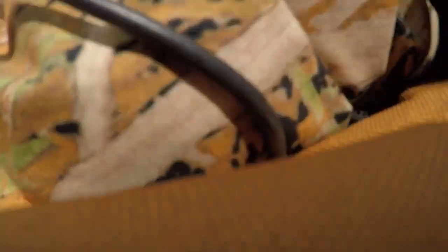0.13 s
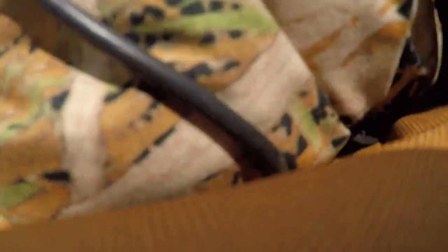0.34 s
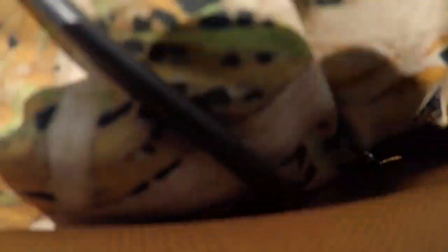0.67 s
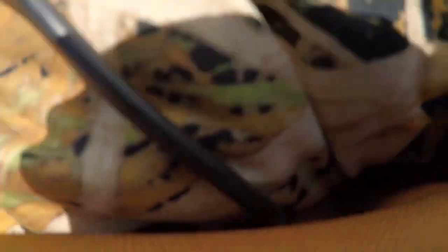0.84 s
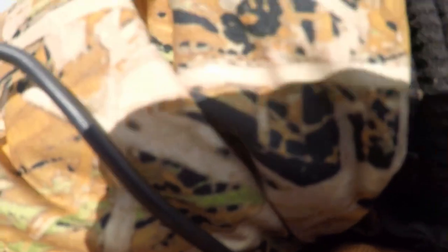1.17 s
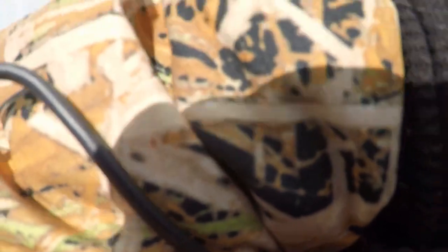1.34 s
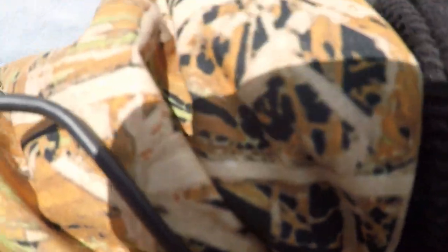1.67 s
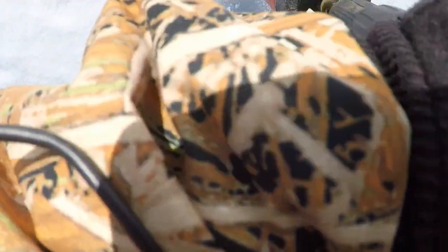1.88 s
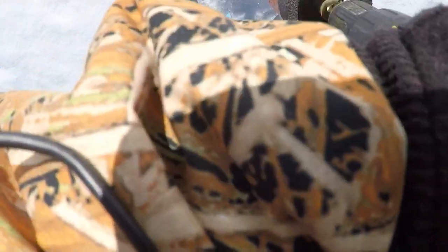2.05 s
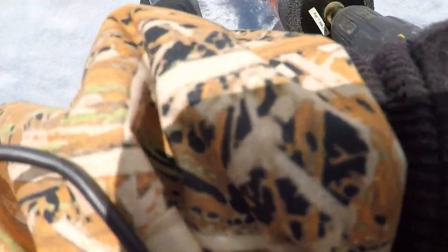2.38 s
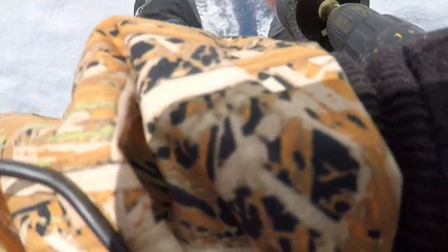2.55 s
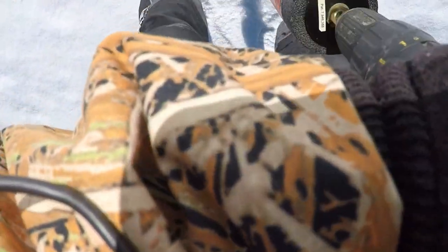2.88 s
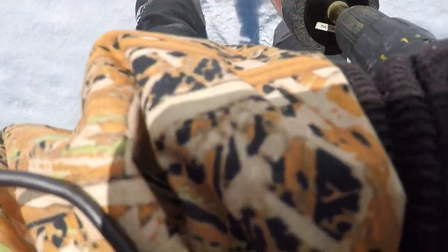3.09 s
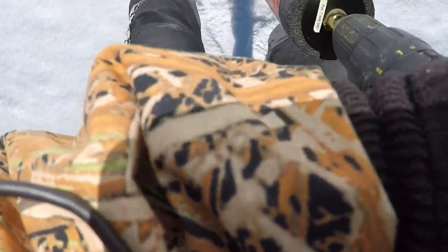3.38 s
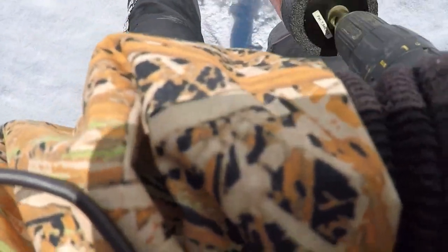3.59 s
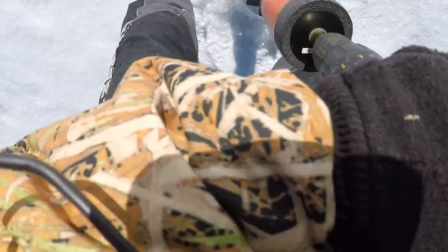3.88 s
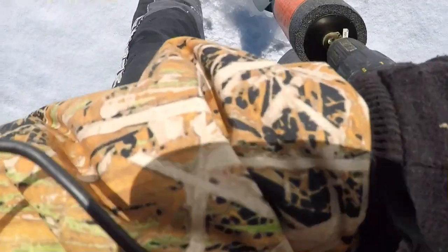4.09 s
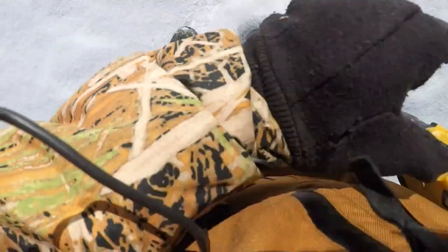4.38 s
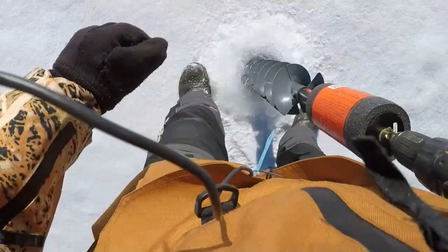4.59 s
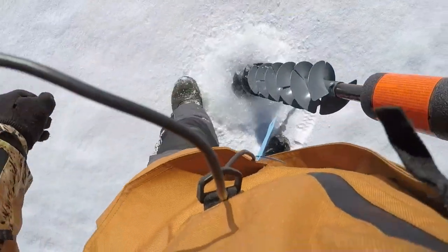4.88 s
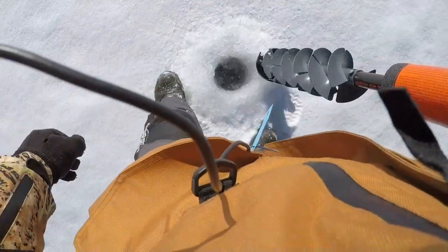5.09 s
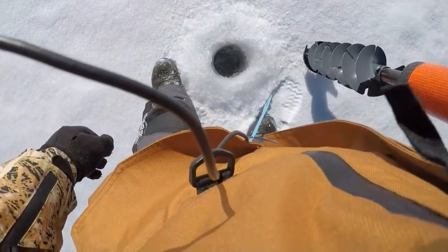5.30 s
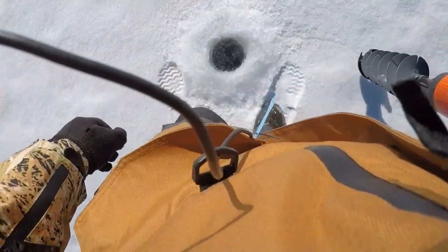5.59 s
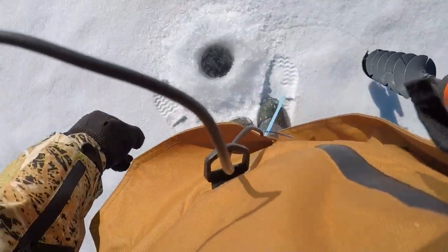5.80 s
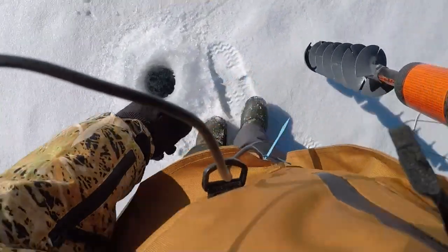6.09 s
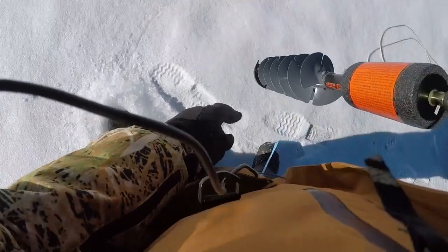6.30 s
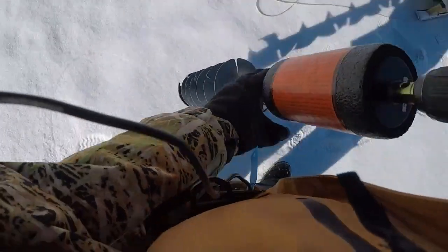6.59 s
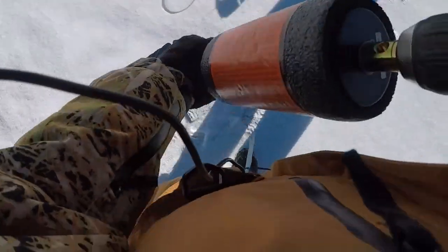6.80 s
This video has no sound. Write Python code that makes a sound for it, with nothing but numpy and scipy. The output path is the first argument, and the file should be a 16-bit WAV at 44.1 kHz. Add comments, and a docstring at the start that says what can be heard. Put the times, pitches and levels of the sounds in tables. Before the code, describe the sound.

Fabric rustle and small ticks, a whining drill grinding through ice, watery slush and slaps, a few clinks of ice, then low wind gusts and jacket rustle.

```python
"""A sleeve rubs and small knocks tick; then a cordless drill spins up an ice auger: gear tones, shaped noise.
A gust swells as the blades whisk snow, then bore in jittery ice grains, ringing a steadily deeper hole.
They break through, the drill races and stops; slush surges from grains, pockets of air slap as sine chirps.
The flights drain and lumps of ice clink through resonances; last, gusts of low noise buffet the microphones
on the driller's chest, while the jacket rustles in fine grains and a strap zips."""
import sys
import numpy as np
from scipy import signal
from scipy.fft import rfft, irfft, next_fast_len
from scipy.io import wavfile
from scipy.ndimage import uniform_filter1d, map_coordinates

SR = 44100
rng = np.random.default_rng(int(sys.argv[2]) if len(sys.argv) > 2 else 0)


def persist_wave(psi):
    """Save psi, clipped to +-1, as 16-bit WAV."""
    counts = np.round(np.clip(psi, -1, 1) * 32767).astype(np.int16)
    wavfile.write(sys.argv[1], SR, np.atleast_2d(counts).T)


N = 306318


def amp(db):
    """Decibels to gain."""
    return 10 ** (np.asarray(db) / 20)


def unit(x):
    """Scale to rms 1."""
    return x / np.sqrt(np.mean(x ** 2) + 1e-20)


def curves(rows):
    """One value per sample for each column after the time."""
    s, *columns = np.transpose(rows)
    return [np.interp(np.arange(N) / SR, s, column) for column in columns]


def stroke(start_s, length_s, attack_s, release_s):
    """Rise from start_s, hold until length_s is over, then fall 60 dB in release_s."""
    t = np.arange(N) / SR - start_s
    return np.clip(t / attack_s, 0, 1) * amp(-60 * np.maximum(t - length_s, 0) / release_s)


def ramp(start_s, length_s):
    """Go from 0 to 1 and stay there."""
    return np.clip((np.arange(N) / SR - start_s) / length_s, 0, 1)


def hump(s, half_s):
    """A bell of height 1 around s."""
    return np.exp(-((np.arange(N) / SR - s) / half_s) ** 2)


def wobble(rate):
    """A smooth random curve, rate knots a second."""
    return map_coordinates(rng.standard_normal(8192), [np.arange(N) * rate / SR], mode="wrap")


def noise():
    """White noise."""
    return rng.standard_normal(N)


def grains(rate, spread_db):
    """Random tiny impacts of uneven size, rate a second, at rms 1."""
    hits = rng.random(N) < rate / SR
    sizes = amp(spread_db * np.clip(noise(), -2, 2))
    return unit(hits * np.sign(noise()) * sizes)


def filtered(x, response):
    """x times a complex response of frequency."""
    m = next_fast_len(N + SR // 2)
    return irfft(rfft(x, m) * response(np.fft.rfftfreq(m, 1 / SR)), m)[..., :N]


def coloured(x, spectrum):
    """x shaped by (Hz, dB) points, at rms 1."""
    f, db = np.transpose(spectrum)
    return unit(filtered(x, lambda hz: amp(np.interp(np.log(hz + 1), np.log(f + 1), db))))


def ringing(x, modes):
    """x through damped resonances, at rms 1."""
    def response(f):
        return sum(amp(db) * 1j * f * width / (centre * centre - f * f + 1j * f * width)
                   for centre, width, db in modes)
    return unit(filtered(x, response))


def low_cut(x, edge_hz):
    """Thin out everything below edge_hz, at rms 1."""
    return unit(filtered(x, lambda hz: hz ** 2 / np.sqrt(hz ** 4 + edge_hz ** 4)))


def patchy(x, depth_db):
    """Let neighbouring pitches swell and fade on their own for some tens of milliseconds."""
    z = signal.stft(x, nperseg=1024)[2]
    field = uniform_filter1d(rng.standard_normal(z.shape), size=4, axis=0)  # across pitch
    field = uniform_filter1d(field, size=4, axis=1)  # across time
    return unit(signal.istft(z * amp(depth_db * unit(field)), nperseg=1024)[1][:N])


def stereo(mid, spectrum, side_db):
    """Colour an excitation and add a noise part that differs between the channels."""
    side = amp(side_db) * noise()
    return coloured(np.array([mid + side, mid - side]), spectrum)


def panned(x, pan_db):
    """Lean to the left by pan_db, keeping the centre level."""
    gains = amp(np.array([pan_db + np.zeros(N), -pan_db + np.zeros(N)]) / 2)
    return x * gains / gains.mean(0)


def add(track, s, sound):
    """Mix a sound into a track at s seconds."""
    part = track[max(round(s * SR), 0):][:len(sound)]
    part += sound[:len(part)]


TEETH, GEAR_RATIO = 9, 27.5  # teeth meshing per motor turn; motor turns per auger turn
TRIGGER_S, RUN_S = 1.055, 3.0  # the trigger is pulled, and held this long
BITE_S, THROUGH_S = 1.267, 3.625  # the blades touch the ice; they break through
DRILL_DB, LOADED_DB = -29.5, -1  # drill level running free; its change under load
FULL_HZ, SLOW_DB_PER_OCTAVE = 2520, 14  # below this mesh speed the free-running gears get quieter
COVERED_DB, UNCOVER_S = -5, 0.37  # a sleeve screens the drill at first, then clears it over this time
COAST_S = 1.0  # the motor's fine sizzle outlasts the gears
# the motor spins up, sags under load, races at breakthrough and brakes: (time [s], gear mesh rate [Hz])
MESH_SPEED = [(1.05, 915), (1.09, 2106), (1.15, 2940), (1.2, 3110), (1.27, 2990), (1.4, 2213), (2.6, 1980),
              (3.58, 2130), (3.66, 2785), (3.72, 3004), (3.86, 3067), (3.92, 2807), (3.98, 2046),
              (4.1, 611)]
# gear tones: (multiple of the motor shaft [-], level running free [dB], level under load [dB])
GEAR_TONES = [(3, -13, -14), (9, -.5, -6), (12, -10, -9), (13, -8, -1), (18, -18, -14), (24, -40, -2)]
# rattle of the gear teeth: (frequency [Hz], relative level [dB])
GEARBOX_COLOUR = [(120, -40), (200, 4), (391, -20), (520, -11), (1070, 0), (1220, -7), (2130, -11),
                  (3020, -11.5), (3580, -13), (4600, -9), (5620, -13), (6430, -26.5), (11000, -50),
                  (14300, -86), (22000, -120)]
# fine treble of the motor: (frequency [Hz], relative level [dB])
SIZZLE_COLOUR = [(6760, -62), (11500, -18), (12000, 10), (12700, 4.5), (14700, 4), (15500, -17)]
# the drill's housing felt through the jacket: (frequency [Hz], relative level [dB])
HOUSING_BUZZ = [(350, -23), (650, -1), (1200, 0), (1900, -22), (4000, -60)]


def drill():
    """Gears whine and rattle once a shaft turn; under load the speed sways with every turn of the auger."""
    mesh_hz, = curves(MESH_SPEED)
    contact = stroke(BITE_S, THROUGH_S - BITE_S, attack_s=.05, release_s=.4)
    load = np.clip((2750 - mesh_hz) / 600, 0, 1) * contact
    hard_ice = load * ramp(1.4, 0.292)
    sway = hard_ice * (0.0314 * auger_turn() + 0.01202 * wobble(30)) + 0.0022 * wobble(120)
    shaft = 2 * np.pi * np.cumsum(mesh_hz * (1 + sway)) / TEETH / SR

    whine = np.zeros(N)
    for k, free_db, loaded_db in GEAR_TONES:
        tone_db = free_db + hard_ice * (loaded_db - free_db) + 2.5 * wobble(60)
        # backlash smears the tones, more so the high and the loaded ones
        smear = k / TEETH * (.3 + .27 * hard_ice) * wobble(260)
        whine += amp(tone_db) * np.sin(k * shaft + smear)
    whine *= np.clip(mesh_hz / 2200, 0, 1) ** 4  # a slow gear is quiet

    teeth = unit(noise() * (1 + 0.26 * np.cos(shaft)) * amp(1.1 * wobble(70)))
    rattle = stereo(patchy(teeth, depth_db=4), GEARBOX_COLOUR, side_db=-14) * amp(6.5 - 2 * load)
    sizzle = panned(stereo(teeth, SIZZLE_COLOUR, side_db=-2.5), pan_db=8.5) * amp(-19.5)
    # the housing rocks the microphones from side to side: opposite signs left and right
    buzz = amp(5.5) * coloured(noise(), HOUSING_BUZZ) * np.array([[1], [-1]])

    slow_db = SLOW_DB_PER_OCTAVE * np.minimum(np.log2(mesh_hz / FULL_HZ), 0) * (1 - load)
    cover_db = COVERED_DB * (1 - ramp(TRIGGER_S, UNCOVER_S))
    level_db = DRILL_DB + LOADED_DB * load + slow_db + cover_db
    gear_run = stroke(TRIGGER_S, RUN_S, attack_s=0.0097, release_s=.35)
    sizzle_run = stroke(TRIGGER_S, RUN_S, attack_s=0.11, release_s=COAST_S)
    gears = amp(level_db) * gear_run * (rattle + amp(-3.5) * whine + buzz)
    return gears + amp(level_db - slow_db / 2) * sizzle_run * sizzle  # sizzle depends less on speed


TURN_RAD = 0.49  # where in the turn the harder side lies


def auger_turn():
    """Swings once per turn of the auger, as the blades bite harder on one side."""
    mesh_hz, = curves(MESH_SPEED)
    return np.sin(2 * np.pi * np.cumsum(mesh_hz) / TEETH / GEAR_RATIO / SR + TURN_RAD)


# the air column in the hole deepens: (time [s], resonance [Hz], level relative to the scraping [dB])
HOLE_RESONANCE = [(1.4, 1050, -10), (2.1, 900, -10), (2.35, 820, -7), (2.52, 640, -2), (2.66, 550, -6),
                  (2.95, 460, -15), (3.66, 330, -12)]


def air_column(x, width_hz):
    """The hole's resonance slides down by crossfading through neighbouring fixed ones."""
    pitch_hz, ring_db = curves(HOLE_RESONANCE)
    steps = np.geomspace(pitch_hz.min(), pitch_hz.max(), num=12)
    column = np.zeros(N)
    for hz, share in zip(steps, np.eye(len(steps))):
        column += np.interp(pitch_hz, steps, share) * ringing(x, [(hz, width_hz, 0)])
    return amp(ring_db) * column


SCRAPE_DB, SINK_S, SINK_DB = -18, 0.52, 8  # full scraping; it grows by SINK_DB while the blades sink in
TURN_DB = 0.5  # swing of the scraping with each turn
GRIP_S = 0.015  # half the length of a skid or catch
SNOW_S, SNOW_DB = 1.133, -28.5  # the blades whisk loose snow
# the blades skid (-) or catch (+): (time [s], level change [dB])
SKIDS_AND_CATCHES = [(1.797, -10), (1.847, 4), (2.095, 1.5), (2.34, 4.5), (2.425, 2), (2.49, -5),
                     (2.587, -8.5), (2.709, -2.5), (3.234, 0.5), (3.3, 3.5), (3.415, 2.5), (3.453, -4.5)]
# the drill shakes the arms and chest: (time [s], level [dB])
SHAKE_LEVEL = [(1.3, -35), (1.55, -16), (1.9, -12.5), (2.33, -19.5), (2.62, -18.5), (2.92, -15),
               (3.25, -19.5), (3.5, -17.5), (3.63, -22)]
# that shaking's low rumble: (frequency [Hz], relative level [dB])
SHAKE_COLOUR = [(12, -32), (20, -5.5), (76, 0), (103, -4), (141, -10), (179, -4), (300, -45), (400, -20.5),
                (520, -37), (880, -120)]
# chipped ice: (frequency [Hz], relative level [dB])
ICE_COLOUR = [(260, -47), (450, -12.5), (535, -4.5), (1320, 4), (2170, -9.5), (2960, -8.5), (3560, -15.5),
              (4790, -21.5), (5760, -24.5), (7000, -34.5), (9100, -41.5), (15400, -120)]
# resonances of the steel auger: (frequency [Hz], width [Hz], level [dB])
AUGER_MODES = [(1157, 49, 5.5), (1393, 73, -3.5), (2980, 110, -1), (4680, 124, -8)]
# whisked loose snow: (frequency [Hz], relative level [dB])
SNOW_COLOUR = [(2060, -24), (3500, -6.5), (3780, 9.5), (5490, -7), (5990, 6), (6370, -2), (7250, -0.5),
               (11000, -29), (14300, -64), (22000, -120)]


def cutting():
    """Blades whisk snow, then chip the ice in judders; auger and hole ring, and the arms pass on the shaking."""
    grip_db = TURN_DB * auger_turn() + sum(db * hump(s, GRIP_S) for s, db in SKIDS_AND_CATCHES)
    scrape_db = SCRAPE_DB - SINK_DB * (1 - ramp(BITE_S, SINK_S)) + grip_db
    shake_db = curves(SHAKE_LEVEL)[0] + 0.44 * grip_db
    judder_db = 1.2 * wobble(28.19) + 1.17 * wobble(130)

    def chips():
        return unit(grains(rate=5000, spread_db=1.0) * amp(judder_db))

    scrape = stereo(patchy(chips(), depth_db=1.8), ICE_COLOUR, side_db=-18)
    ring_colour = [(400, -30), (900, -3.5), (5000, -1.0), (8000, -38)]
    ring = amp(-9) * coloured(ringing(chips(), AUGER_MODES), ring_colour)
    hole = filtered(air_column(chips(), width_hz=37), lambda hz: 1 / (1 + (hz / 1500) ** 4))
    shake = panned(stereo(noise() * amp(1.9 * judder_db), SHAKE_COLOUR, side_db=4.5), pan_db=-10.0)

    powder = stereo(grains(rate=4900, spread_db=4), SNOW_COLOUR, side_db=-5.5)
    snow = amp(SNOW_DB) * stroke(SNOW_S, 0.29, attack_s=.13, release_s=1.73) * powder
    boring = stroke(BITE_S, THROUGH_S - BITE_S, attack_s=0.3, release_s=0.13)
    return snow + boring * (amp(scrape_db) * (scrape + ring + hole) + amp(shake_db) * shake)


SURGE_ATTACK_S, SURGE_RELEASE_S = 0.018, 0.26
DRAIN_S, DRAIN_DB_PER_S = 4.3, 13  # from then on the lifted flights drain, ever more quietly
DRAIN_CHURN_DB, DRAIN_SPRAY_DB = -40.5, -48.5
# the auger is pulled up in surges, thinner as it clears the water:
# (time [s], length [s], churning level [dB], spray level [dB], low-cut edge [Hz])
SLUSH_SURGES = [(3.63, 0.17, -26.5, -52, 140), (3.89, 0.073, -27, -50, 140), (4.023, 0.23, -35, -48, 140),
                (4.272, 0.042, -29.5, -53, 202), (4.446, 0.21, -28.5, -52.5, 564)]
# churned water: (frequency [Hz], relative level [dB])
WATER_COLOUR = [(76, -39), (130, -13), (167, 11.5), (205, 2), (327, 3), (560, -4), (718, 2), (945, -1.5),
                (1530, -12.5), (1690, -13), (1830, -11), (2380, -15.5), (3500, -26), (4550, -56),
                (7700, -120)]
# thrown spray: (frequency [Hz], relative level [dB])
SPRAY_COLOUR = [(1060, -12), (1800, -2), (2390, 2), (3530, -1.5), (4780, 1), (5700, -3), (7310, -34),
                (8650, -56), (11000, -45), (12600, -16), (15000, -24)]
# ice crumbs striking the flights: (frequency [Hz], width [Hz], level [dB])
CRUMB_MODES = [(1880, 210, 7.5), (2030, 69, -17), (4150, 180, 6), (4600, 100, 8)]
# water and ice slapping in the hole: (time [s], level [dB], starting pitch [Hz])
SLAPS = [(3.735, -16, 1834), (3.787, -14, 1225), (3.936, -10, 789), (4.052, -8.5, 857), (4.123, -21.5, 770),
         (4.158, -32, 756), (4.185, -21, 683), (4.297, -23, 846), (4.322, -17.5, 855), (4.488, -16, 1013),
         (4.529, -18, 1130), (4.638, -17, 937), (4.679, -17.5, 960), (4.735, -24.5, 820)]


def slush():
    """The flights churn water and ice, throw spray and crumbs, and slap pockets of air into ringing."""
    churn_grains = grains(rate=1200, spread_db=3.5) * amp(2.9 * wobble(60))
    churn = coloured(patchy(churn_grains, depth_db=2), WATER_COLOUR)
    spray = coloured(patchy(grains(rate=2900, spread_db=3.0), depth_db=0.5), SPRAY_COLOUR)
    crumbs = amp(-1.5) * ringing(grains(rate=320, spread_db=3.5), CRUMB_MODES)
    spray = spray + filtered(crumbs, lambda hz: 1 / (1 + (hz / 6000) ** 10))  # wet ice lands softly

    surges = np.zeros(N)
    for s, length, churn_db, spray_db, low_hz in SLUSH_SURGES:
        pull = stroke(s, length, SURGE_ATTACK_S, SURGE_RELEASE_S)
        surges += pull * (amp(churn_db) * low_cut(churn, low_hz) + amp(spray_db) * spray)
    ebb = stroke(DRAIN_S, 0, SURGE_ATTACK_S, 60 / DRAIN_DB_PER_S)
    drain = ebb * (amp(DRAIN_CHURN_DB) * churn + amp(DRAIN_SPRAY_DB) * spray)

    slaps, t = np.zeros(N), np.arange(SR // 8) / SR
    swell = t / .012 * np.exp(1 - t / .012)
    for s, db, hz in SLAPS:
        # a pocket of air rings with rising pitch
        pocket = amp(-60 * t / .055) * np.sin(2 * np.pi * hz * t * (1 + .8 * t)) * (1 - np.exp(-t / .0012))
        crunch_band = signal.butter(3, [hz * 0.67, hz * 2], "band", fs=SR, output="sos")
        crunch = signal.sosfilt(crunch_band, rng.standard_normal(len(t)))
        smack_band = signal.butter(4, [hz, 3600], "band", fs=SR, output="sos")
        smack = signal.sosfilt(smack_band, rng.standard_normal(len(t)) * amp(-60 * t / 0.016))
        add(slaps, s, amp(db) * (pocket + amp(-9) * smack))
        add(slaps, s - .008, amp(db - 24.0) * swell * unit(crunch))  # slush piles up just before each slap
    return surges + drain + slaps


# lumps of ice clink on the steel flights: (time [s], level [dB])
ICE_CLINKS = [(4.835, -28.5), (4.86, -30), (4.8744, -35), (4.9646, -41), (5.0744, -38)]
# resonances of the flights: (frequency [Hz], width [Hz], level [dB])
FLIGHT_MODES = [(1350, 140, 1), (2100, 120, 2), (2480, 200, -15), (4270, 320, -6)]


def clinks():
    """Each lump of ice cracks, crumbles and briefly rings the flights."""
    out, t = np.zeros(N), np.arange(SR // 6) / SR
    for s, db in ICE_CLINKS:
        crumble = rng.standard_normal(len(t)) * amp(-60 * t / 0.069)  # falls 60 dB in 69 ms
        ring = np.zeros(len(t))
        for hz, width, mode_db in FLIGHT_MODES:
            ring += amp(mode_db) * signal.lfilter(*signal.iirpeak(hz, hz / width, fs=SR), crumble)
        crack = amp(-33) * rng.standard_normal(len(t)) * amp(-60 * t / 0.0064)
        add(out, s, amp(db) * (ring / np.abs(ring).max() + crack))
    return out


RUB_ATTACK_S, RUB_RELEASE_S = .04, 0.64
RUSTLE_ATTACK_S, RUSTLE_RELEASE_S = 0.24, 0.47
ZIP_S, ZIP_LENGTH_S, ZIP_DB = 6.513, 0.061, -31  # a sleeve slides over a strap
# the sleeve rubs right beside the microphones: (time [s], length [s], level [dB])
SLEEVE_RUBS = [(-.05, 0.28, -39.5), (0.26, 0.36, -44.5), (0.594, 0.14, -43), (0.767, 0.071, -39.5),
               (0.937, 0.19, -47.5), (1.048, 0.071, -31), (6.21, 0.14, -45)]
# the arm reaches for the auger and the whole jacket rustles: (time [s], length [s], level [dB])
JACKET_RUSTLES = [(5.794, 2.3, -47.5), (6.15, 0.38, -46), (6.61, 0.13, -40.5)]
# two spectra, sleeve then chest: (frequency [Hz], relative level [dB])
CLOTH_COLOURS = ([(240, 9), (400, 3), (558, 0), (1060, -6.5), (1740, -5.5), (2830, -10), (3240, -15.5),
                  (4330, -6), (6040, -14.5), (7240, -27), (11200, -36), (12500, -26), (15000, -37)],
                  [(410, -41), (700, 1), (1070, -1), (2190, -5.5), (2830, -7), (5590, -7.5), (8980, -18),
                  (11200, -27), (12500, -22), (15000, -47)])
# ribbed nylon: (frequency [Hz], relative level [dB])
NYLON_COLOUR = [(1900, -16), (2500, 4), (3500, 1.5), (4100, -14), (4900, 6), (5600, 0), (6500, -4),
                (12000, -40)]


def jacket():
    """Stiff fabric rubs in fine grains and its folds crackle; one quick stroke of ribbed nylon zips."""
    def fibres():
        folds = amp(-9.5) * grains(rate=42, spread_db=10.5)
        return unit(grains(rate=6000, spread_db=-0.5) + folds)

    sleeve, chest = CLOTH_COLOURS
    rub_level = sum(amp(db) * stroke(s, length, RUB_ATTACK_S, RUB_RELEASE_S)
                    for s, length, db in SLEEVE_RUBS)
    rubs = rub_level * stereo(fibres(), sleeve, side_db=-9.0)
    rustle_level = sum(amp(db) * stroke(s, length, RUSTLE_ATTACK_S, RUSTLE_RELEASE_S)
                       for s, length, db in JACKET_RUSTLES)
    rustles = rustle_level * stereo(fibres(), chest, side_db=-7.5)
    ribs = stereo(noise() * amp(2.4 * wobble(200)), NYLON_COLOUR, side_db=-10.0)
    zipped = amp(ZIP_DB) * stroke(ZIP_S, ZIP_LENGTH_S, attack_s=0.012, release_s=0.071) * ribs
    return panned(rubs + rustles + zipped, pan_db=-0.5)


# soft bumps on the microphones' body: (time [s], level [dB])
SOFT_BUMPS = [(0.453, -20), (0.511, -20), (3.799, -15), (3.899, -11), (4.036, -9.5), (4.32, -23),
              (4.485, -13.5), (5.017, -17), (5.535, -15.5), (5.637, -17), (5.832, -9.5), (6.25, -10),
              (6.403, -6.5)]
# small ticks of the trigger, buckles and ice crumbs: (time [s], peak level [dB], pitch [Hz])
SMALL_TICKS = [(0.4116, -39, 1700), (0.5214, -41, 1970), (0.6963, -32, 1600), (0.776, -38, 1890),
               (0.83, -34, 1410), (1.032, -38.5, 5370), (1.067, -23, 1900), (5.014, -34.5, 1810),
               (5.3034, -39, 4300), (5.842, -37.5, 7700), (6.789, -22, 4540)]


def knocks():
    """Bumps give one dull push of two decaying sines; ticks are short decaying bands of noise."""
    out, t = np.zeros(N), np.arange(SR // 8) / SR
    low = amp(-60 * t / 0.04) * np.sin(2 * np.pi * 105 * t)
    high = 0.73 * amp(-60 * t / 0.031) * np.sin(2 * np.pi * 280 * t)
    push = (low + high) * (1 - np.exp(-t / 0.003))  # soft onset
    for s, db in SOFT_BUMPS:
        add(out, s, amp(db) * push)
    for s, db, hz in SMALL_TICKS:
        band = signal.butter(2, [hz * 0.53, min(hz * 1.19, SR / 2 - 1)], "band", fs=SR, output="sos")
        tick = signal.sosfilt(band, rng.standard_normal(len(t)) * amp(-60 * t / 0.039))
        add(out, s, amp(db) * tick / np.abs(tick).max())
    return out


BUFFET_DB = -3.5  # slow buffeting relative to the flutter
# strength of the wind: (time [s], level [dB])
WIND_STRENGTH = [(0, -36.5), (1.04, -37.5), (1.11, -23), (1.26, -9), (1.65, -22), (2.3, -37), (3.9, -36),
                 (4.3, -39), (5.35, -40.5), (5.74, -33.5), (5.85, -26.5), (6.12, -25.5), (6.32, -19),
                 (6.95, -23)]
# single heaves of air on the microphone ports: (time [s], half length [s], level [dB])
AIR_HEAVES = [(0.391, 0.13, -36.5), (1.157, 0.029, -26), (4.413, 0.036, -24.5), (6.036, 0.051, -19.5),
              (6.182, 0.057, -18.5), (6.45, .04, -17), (6.647, 0.03, -14.5), (6.88, 0.1, -12)]
# slow buffeting: (frequency [Hz], relative level [dB])
BUFFET_COLOUR = [(11, -43), (18, 8.5), (39, 6.5), (110, -16.5), (140, -40), (240, -120)]
# faster flutter: (frequency [Hz], relative level [dB])
FLUTTER_COLOUR = [(41, -3), (70, 2), (160, -4.5), (210, -8), (248, -8.5), (624, -24.5), (1060, -38),
                  (1800, -43), (2340, -48), (3960, -120)]


def wind():
    """Wind from the right: one strength drives slow buffeting and a faster flutter, with single heaves on top."""
    strength = amp(curves(WIND_STRENGTH)[0])
    heaves = sum(amp(db) * hump(s, half) for s, half, db in AIR_HEAVES)
    buffet = panned(stereo(noise(), BUFFET_COLOUR, side_db=-44), pan_db=-0.5)
    flutter = panned(stereo(noise() * amp(2.6 * wobble(35)), FLUTTER_COLOUR, side_db=-4), pan_db=-5.5)
    return (amp(BUFFET_DB) * strength + heaves) * buffet + strength * flutter


# faint background hiss: (frequency [Hz], relative level [dB])
HISS_COLOUR = [(590, -26), (1000, -0.5), (2390, 1.5), (2770, -5.5), (4620, -6.5), (7180, -11), (9010, -8),
               (15000, -21)]


def background_hiss():
    """Steady shaped noise, slightly different in each channel."""
    return amp(-59.5) * stereo(noise(), HISS_COLOUR, side_db=-10)


def scene():
    """Open snow gives no echo: every source arrives dry, over a faint hiss."""
    ice_work = drill() + cutting() + slush() + clinks()
    return ice_work + jacket() + knocks() + wind() + background_hiss()


TOP_HZ = 15400  # band limit
OPEN_S, CLOSE_S = 0.13, 1.22  # time to widen the image; time to narrow it by 60 dB
# the stereo image widens twice, at set times, as the drill starts and again near the end:
# (time [s], length [s], width [dB])
IMAGE_OPENINGS = [(1.104, 0.34, 0), (5.394, 1.6, 6)]


def record(dry):
    """Narrow the image below 11.3 kHz outside two set spans, round off peaks and cut all above the band limit."""
    mid, side = (dry[0] + dry[1]) / 2, (dry[0] - dry[1]) / 2
    top = filtered(side, lambda hz: hz > 11300)  # the top keeps its full width
    width = sum(amp(db) * stroke(s, length, OPEN_S, CLOSE_S) for s, length, db in IMAGE_OPENINGS)
    side = top + width * (side - top)
    pair = np.array([mid + side, mid - side])
    rounded = pair / (1 + np.abs(pair / .9) ** 6) ** (1 / 6)
    return filtered(rounded, lambda hz: hz < TOP_HZ)


dry = scene()
out = record(dry)
persist_wave(out)
```